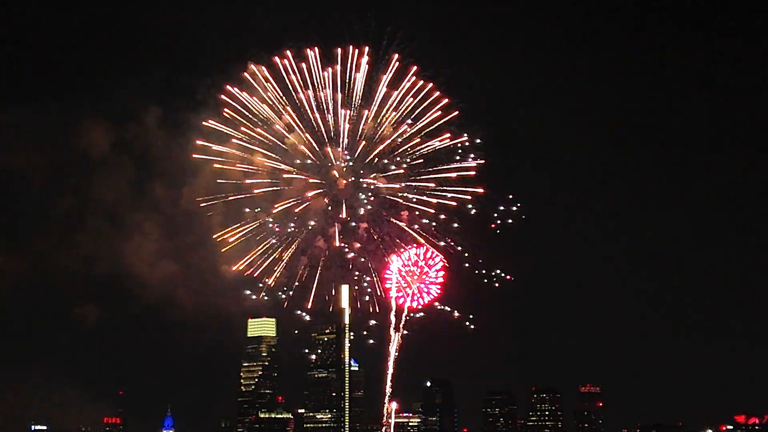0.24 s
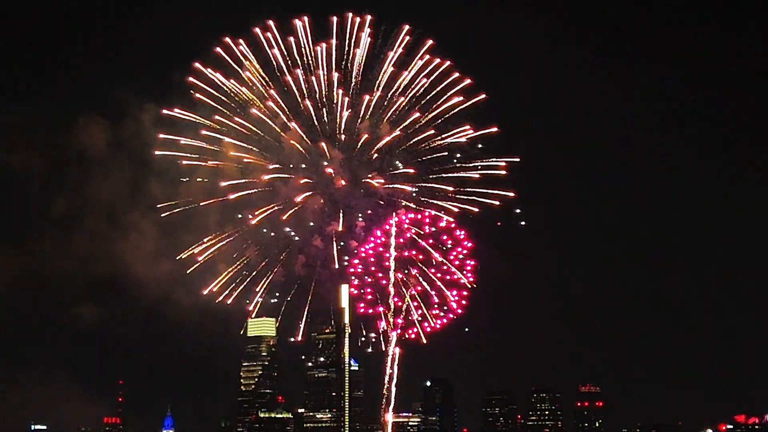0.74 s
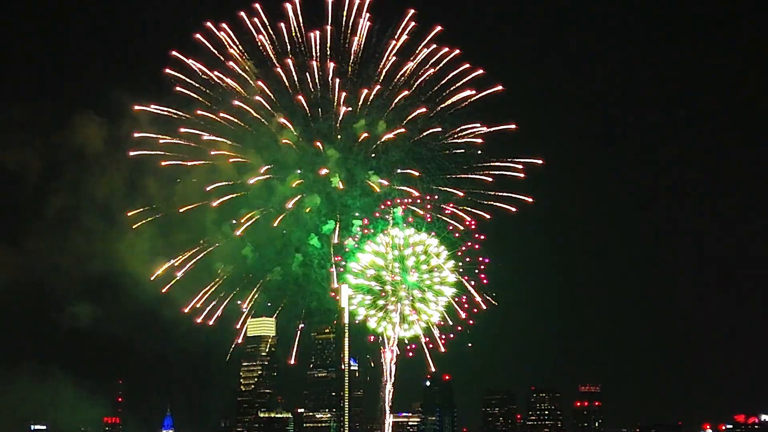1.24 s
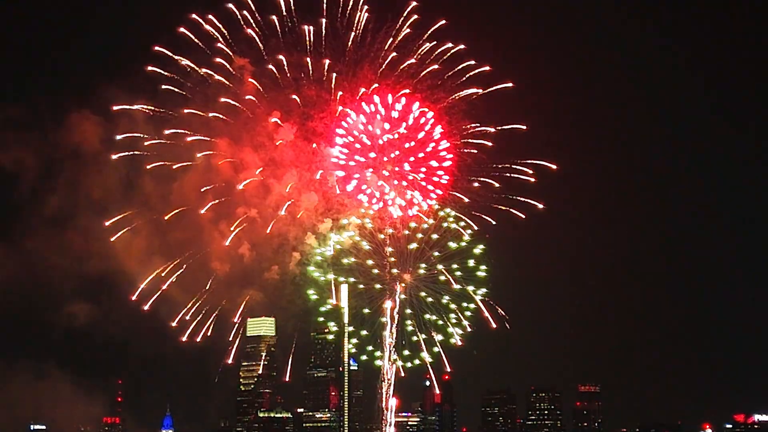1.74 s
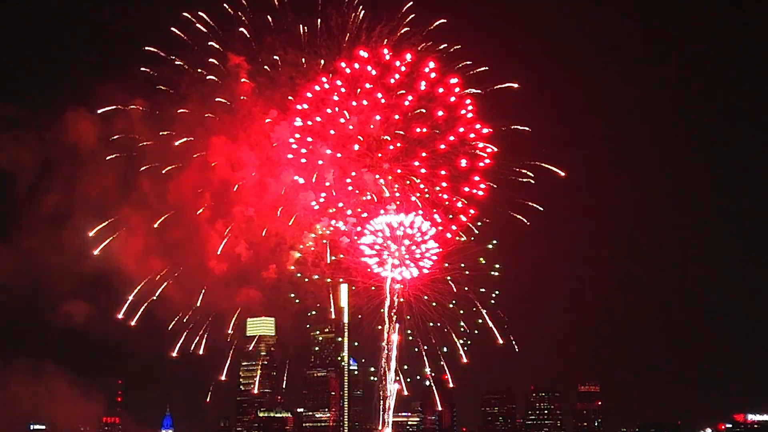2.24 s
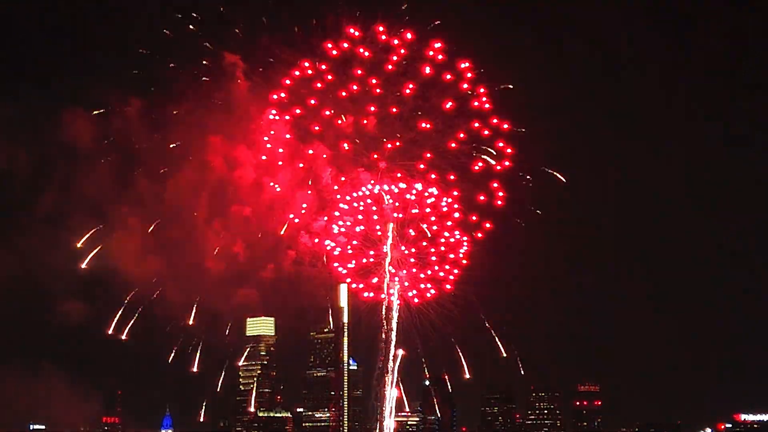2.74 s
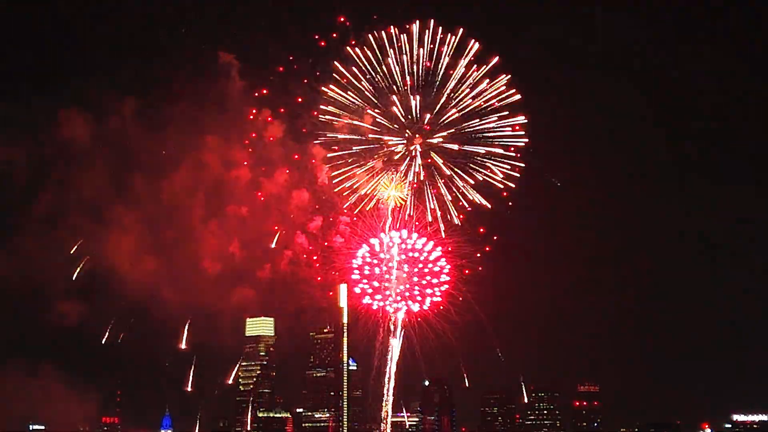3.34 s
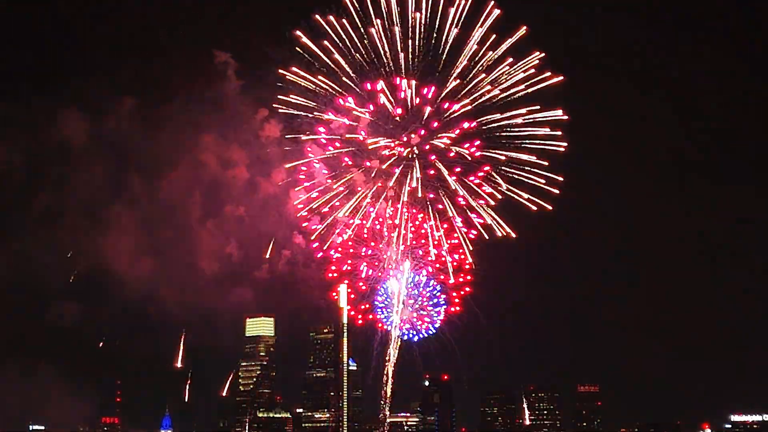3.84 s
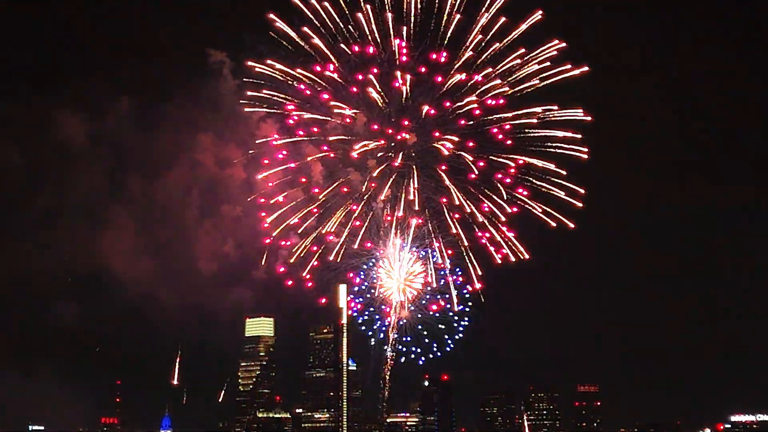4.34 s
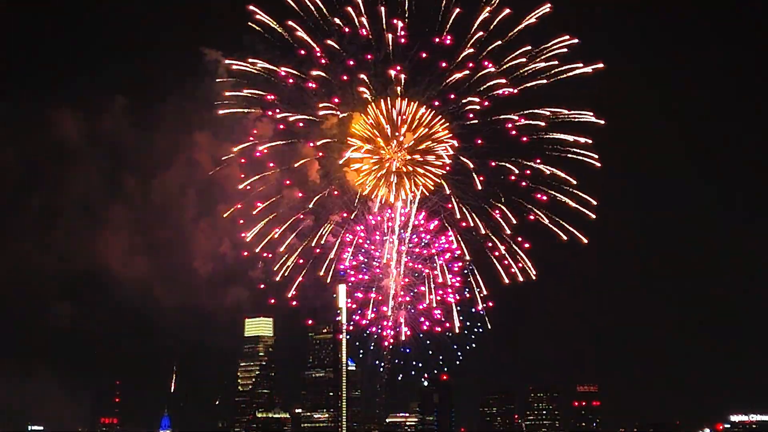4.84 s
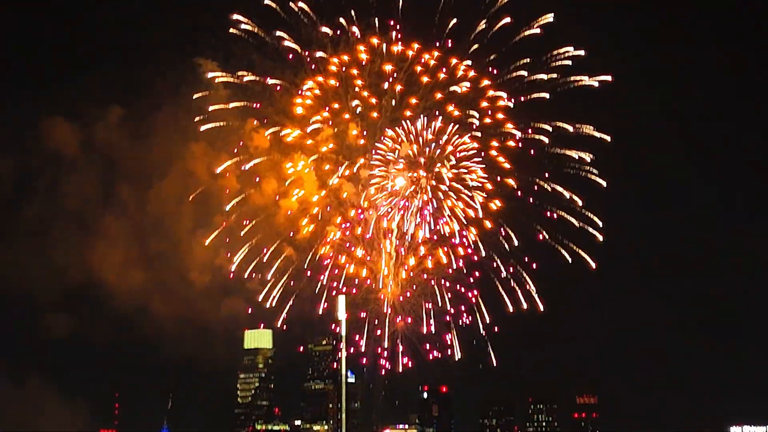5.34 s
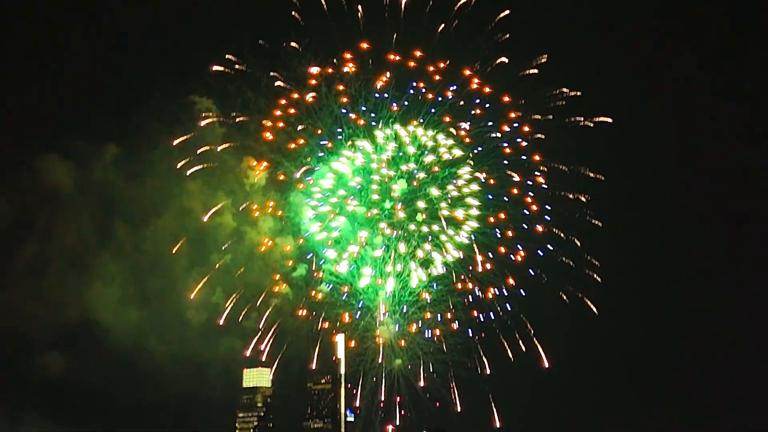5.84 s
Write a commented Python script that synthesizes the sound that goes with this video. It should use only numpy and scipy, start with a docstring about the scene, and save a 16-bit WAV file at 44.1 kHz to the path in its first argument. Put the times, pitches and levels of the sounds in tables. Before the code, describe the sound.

Sharp aerial firework bangs echo off city buildings and quicken toward the end, with muffled far thuds and a low city roar.

```python
"""Fireworks over a city at night

Five shells burst singly, then two quick pairs. Each blast wave arrives directly and off the ground;
the loud ones overload a small microphone. Near walls clatter and the skyline rolls on behind.
Far thuds stand in the roar of the city."""
import sys
import numpy as np
from scipy import signal
from scipy.fft import rfft, irfft, next_fast_len
from scipy.io import wavfile
from scipy.ndimage import map_coordinates

SR = 44100
rng = np.random.default_rng(int(sys.argv[2]) if len(sys.argv) > 2 else 0)


def master(y):
    """Save y as 16-bit WAV."""
    cut = np.clip(np.atleast_2d(y).T, -1, 1)
    pcm = np.round(cut * 32767)  # scale
    wavfile.write(sys.argv[1], SR, pcm.astype(np.int16))


N = 269451

# City swell, rows in groups. Each row: time in seconds, bass, mids, upper mids in dB before layer gain.
CITY_LEVELS = [
    [(0.0, -52, -48, -61.5), (0.42, -52.5, -49, -60), (1.12, -57.5, -48, -52)],
    [(2.38, -59, -53.5, -55.5), (2.574, -45, -51.5, -59.5), (2.79, -39, -46, -61)],
    [(3.15, -46, -46.5, -58.5), (3.274, -45, -47.5, -55.5), (3.38, -46, -43.5, -58)],
    [(4.18, -51, -43, -60), (4.568, -51, -39, -57), (4.75, -46.5, -35.5, -54.5)],
    [(5.72, -47, -42, -52), (5.8, -50, -40, -50.5), (6.08, -47, -40.5, -50)],
]
# City noise spectra. Each row: frequency in Hz, relative level in dB.
RUMBLE_SPECTRUM = [(25, -57.5), (50, -18.5), (100, -1), (200, -3), (340, -2.5), (600, -27.5), (1500, -72),
                   (4000, -110)]
ROAR_SPECTRUM = [(150, -28), (340, -1.5), (420, -3), (490, 4.5), (560, -1), (680, -1), (950, -9.5),
                 (1400, -45), (3000, -67.5), (8000, -100)]
RUSH_SPECTRUM = [(400, -11.5), (1000, 1.5), (1350, 1.5), (1900, -16.5), (2600, -21.5), (4000, -31.5),
                 (8000, -53), (16000, -81)]
HISS_SPECTRUM = [(500, -0.5), (2200, 7.5), (3700, 6), (4600, -14.5), (6000, -49)]
THIN_HISS_SPECTRUM = [(3000, -9.5), (5500, -5.5), (6000, 5), (6300, -1), (7400, -7.5), (8200, -11),
                      (12000, -17.5), (16000, -25.5)]
# Far reports. Each row: start in seconds, thump level in dB, pitch in Hz.
FAR_REPORTS = [(.024, -41, 171), (.112, -32.5, 187), (0.499, -43, 188), (.66, -33, 214),
               (1.195, -21.5, 430), (1.201, -42, 90), (1.825, -27, 150), (2.563, -33, 148),
               (2.644, -21.5, 120.4), (2.705, -33, 242), (3.515, -17, 308), (4.256, -44.5, 1380),
               (4.265, -34, 608), (4.558, -23, 573), (5.924, -35, 580), (6.039, -36, 190)]
# Echo spectra. Each row: frequency in Hz, relative level in dB.
SKYLINE_SPECTRUM = [(25, -44), (45, -36), (75, 3), (140, -1), (320, 2.5), (650, -6), (1200, -14.5),
                    (2000, -25), (3700, -26.5), (4700, -39), (7300, -43.5), (10000, -57), (15000, -67)]
WALL_SPECTRUM = [(40, -3.5), (85, 6), (180, -4.5), (400, -0.5), (700, 1), (1100, 0.5), (2000, -2),
                 (4000, 14), (8000, 5.5), (15000, 6)]
# Skyline echo decay. Each row: frequency in Hz, factor on T60.
SKYLINE_DECAY = [(60, 0.87), (300, 0.79), (1000, 0.83), (3500, 0.67), (7000, 0.52), (10000, 0.32),
                 (14000, 0.27)]
# Shell bursts. Each row: start in seconds, blast gain in dB, push length in ms, ground echo lag in ms,
# skyline echo gain in dB, echo treble gain in dB.
BURSTS = [(1.3663, 24, 2.63, 1.59, -21.5, 3), (2.0480, 14, 1.2, 1.05, -26.5, -0.5),
          (2.8513, 19.5, 1.01, 0.964, -24, -3), (3.4317, 20, 3, 1.71, -23.5, -3),
          (3.8888, 18.5, 1.1, 1.125, -23, -6), (4.8299, 22.5, 2.18, 1.65, -18.5, 1),
          (4.8986, 15, 1.14, 1.11, -23.5, -2.5), (5.3668, 18, 2.7, 1.56, -20.5, -1.5),
          (5.4433, 10.5, 1.06, 0.85, -25.5, -3)]

MID_PUSH_MS, MID_THUD_DB = 1.75, -31.5  # a middling shell, a middling thud


def amp(db):
    return 10 ** (np.asarray(db) / 20)


def unit_rms(x):
    return x / np.sqrt(np.mean(x ** 2) + 1e-20)


def log_interp(points, hz):
    knots_hz, values = np.transpose(points)
    return np.interp(np.log(hz + 1), np.log(knots_hz + 1), values)


def add(track, start_s, x):
    start = max(round(start_s * SR), 0)
    track[start:start + len(x)] += x[:len(track) - start]


def filtered(x, response):
    """Apply a complex response, given as a function of Hz."""
    size = next_fast_len(len(x) + SR // 4)
    return irfft(rfft(x, size) * response(np.fft.rfftfreq(size, 1 / SR)), size)[:len(x)]


def delay(hz, lag_ms):
    return np.exp(-2j * np.pi * hz * lag_ms / 1000)


def noise(spectrum, size):
    return unit_rms(filtered(rng.standard_normal(size), lambda hz: amp(log_interp(spectrum, hz))))


def wobble(rate_hz):
    """Smooth random curve, N samples."""
    knots = rng.standard_normal(int(N * rate_hz / SR) + 4)
    return map_coordinates(knots, [np.arange(N) * rate_hz / SR])


def side_wall(x, gain, lag_ms=6.44):
    """A wall beside the microphone repeats diffuse sound, making it slightly hollow."""
    return filtered(x, lambda hz: 1 + gain / (1 + (hz / 2500) ** 2) * delay(hz, lag_ms))


def city(thin_hiss_db=-84, waver_db=1.45):
    """Four slowly swelling noise bands over a steady, thin hiss."""
    times_s, *bands_db = np.vstack(CITY_LEVELS).T
    bass_db, mids_db, upper_db = [np.interp(np.arange(N) / SR, times_s, db) for db in bands_db]
    hiss_db = -70.5 + 0.27 * (upper_db - upper_db.mean())
    out = amp(thin_hiss_db) * noise(THIN_HISS_SPECTRUM, N)
    for db, spectrum in ((bass_db + 2, RUMBLE_SPECTRUM), (mids_db - 0.5, ROAR_SPECTRUM),
                         (upper_db - 1.5, RUSH_SPECTRUM), (hiss_db, HISS_SPECTRUM)):
        out += amp(db + waver_db * wobble(14)) * noise(spectrum, N)
    return side_wall(out, gain=0.28)


def thud(db, pitch_hz, q=2.1, muffle_hz=1500, rumble_t60_s=0.41):
    """Distance leaves a soft thump and a muffled rumble; the fainter, the slower and wetter."""
    def band(hz):
        resonance = hz * pitch_hz / q / (pitch_hz ** 2 - hz ** 2 + 1j * hz * pitch_hz / q)
        return resonance * hz ** 2 / (hz ** 2 + (pitch_hz / 3) ** 2)

    t = np.arange(SR) / SR
    cycles = pitch_hz * t
    peak_cycles = 2.1 * 1.003 ** (MID_THUD_DB - db)
    age = (cycles / peak_cycles) ** 2
    jitter_cycles = 0.08 * map_coordinates(rng.standard_normal(SR // 20), [cycles])
    thump = age * np.exp(1 - age) * np.sin(2 * np.pi * (cycles + jitter_cycles + rng.random()))
    rumble = unit_rms(filtered(rng.standard_normal(len(t)), band))
    rumble = filtered(rumble, lambda hz: 1 / (1 + (hz / muffle_hz) ** 6))
    rumble_db = -35.5 + 0.27 * (db - MID_THUD_DB) - 60 * t / rumble_t60_s
    return amp(db) * thump + amp(rumble_db) * (1 - np.exp(-2 * age)) * rumble


def far_thuds(gap_s=1, faint_db=-46, faint_hz=176, scatter_db=7, scatter_octaves=0.5):
    """Clear far reports, plus fainter ones at random times."""
    out = np.zeros(N)
    for start_s, db, pitch_hz in FAR_REPORTS:
        add(out, start_s, thud(db, pitch_hz))
    for slot_s in np.arange(0, N / SR - gap_s, gap_s):
        report = thud(MID_THUD_DB, faint_hz * 2 ** (scatter_octaves * rng.uniform(-1, 1)))
        start_s = slot_s + gap_s * rng.random()
        level_db = faint_db + scatter_db * rng.uniform(-1, 1)
        add(out, start_s, amp(level_db - MID_THUD_DB) * report)
    return out


def skyline(treble_db, t60_s, shell_size, top_t60_factor, top_hz=4800, rise_s=0.0024, early_s=0.021):
    """Rolling echo of many buildings: bass comes in lumps, treble fades smoothly and first."""
    t = np.arange(2 * SR) / SR
    hz, frames_s, spectra = signal.stft(noise(SKYLINE_SPECTRUM, len(t)), SR, nperseg=256)
    treble = (hz ** 2 / (hz ** 2 + 1000 ** 2))[:, None]
    top = hz ** 6 / (hz ** 6 + top_hz ** 6)
    band_t60_s = t60_s * log_interp(SKYLINE_DECAY, hz) * top_t60_factor ** top
    lumps_db = 1.65 * np.interp(frames_s, np.arange(N) / SR, wobble(35.7))
    # The echo holds at first, then runs out of buildings.
    fade_db = -60 * (frames_s / band_t60_s[:, None]) ** (1.03 + 0.21 * treble)
    spectra *= amp(fade_db + treble_db * treble + lumps_db * (1 - treble))
    tail = signal.istft(spectra, SR, nperseg=256)[1][:len(t)]
    bass_db = 4 * shell_size  # a longer push rolls deeper
    tail = filtered(tail, lambda hz: amp(bass_db * np.exp(-(hz / 110) ** 2)))
    return tail * (1 - np.exp(-t / rise_s)) * (1 + np.exp(-t / early_s))


def near_walls(wave, gap_s=0.0012, rise_s=0.006, t60_s=0.042):
    """Dense clatter of reflections right behind the blast."""
    t = np.arange(SR // 3) / SR
    reflections = noise(WALL_SPECTRUM, len(t) + len(wave))
    clatter = unit_rms(signal.fftconvolve(reflections, wave, "valid"))[:len(t)]
    onset = 1 - np.exp(-np.maximum(t - gap_s, 0) / rise_s)
    return clatter * onset * amp(-60 * t / t60_s)


def microphone(x, cut_hz=175, sub_hz=48, thin_hz=280):
    """Inverts the blast; the resonant bass cut makes it swing a few times."""
    def high_pass(hz, corner_hz, q):
        return -hz ** 2 / (corner_hz ** 2 - hz ** 2 + 1j * hz * corner_hz / q)

    def bass_cut(hz):
        thinning = 1j * hz / (1j * hz + thin_hz)
        return high_pass(hz, cut_hz, q=1.24) * high_pass(hz, sub_hz, q=0.77) * thinning

    return -filtered(x, bass_cut)


def blast(push_ms, ground_ms, front_hz, shock_hz=5000, wall_ms=2.97, wall_hz=600):
    """A sharp push and a longer suction, repeated by the ground and one dull wall."""
    def path(hz):
        front = 1 / (1 + 1j * hz / front_hz) ** 2  # rounded by distance
        shock = 0.0023 / (1 + 1j * hz / shock_hz)
        ground = 0.72 * delay(hz, ground_ms)
        wall = 0.12 * delay(hz, wall_ms) / (1 + 1j * hz / wall_hz)
        return (front + shock) * (1 + ground + wall)

    age = np.arange(SR // 10) / SR * 1000 / push_ms
    return filtered((1 - age) * np.exp(-age), path)


def shells():
    """Blast waves with near and far echoes; big shells in the open ring longest."""
    near, far = np.zeros((2, N))
    for start_s, blast_db, push_ms, ground_ms, skyline_db, treble_db in BURSTS:
        shell_size = np.log2(push_ms / MID_PUSH_MS)
        # More echo treble stands for a burst more in the open.
        front_hz = 881 * 1.07 ** shell_size * 1.029 ** treble_db
        walls_db = blast_db - 18 + 3.6 * shell_size + 0.26 * treble_db
        t60_s = 1.222 * 1.2 ** shell_size * 1.053 ** treble_db
        top_t60_factor = 1.11 ** (skyline_db + 22)  # weaker echoes lose their top sooner
        wave = microphone(blast(push_ms, ground_ms, front_hz))
        add(near, start_s, amp(blast_db) * wave)
        add(near, start_s, amp(walls_db) * near_walls(wave))
        add(far, start_s, amp(skyline_db) * skyline(treble_db, t60_s, shell_size, top_t60_factor))
    return near + side_wall(far, gain=0.12)


def scene():
    """Bursts, far thuds and city, in mono."""
    return (shells() + far_thuds() + city())[None]


def record(dry, limit_hz=16500):
    """Hard clip at full scale, then a steep band limit."""
    clipped = np.clip(dry[0], -1, 1)
    return filtered(clipped, lambda hz: 1 / np.sqrt(1 + (hz / limit_hz) ** 60))[None]


dry = scene()
out = record(dry)
master(out)
```